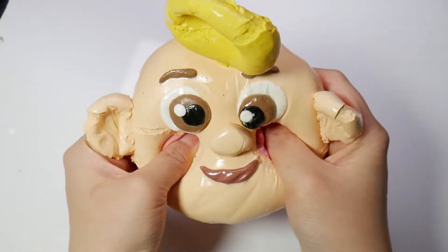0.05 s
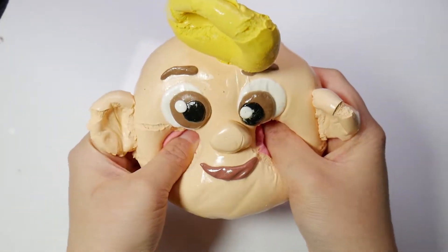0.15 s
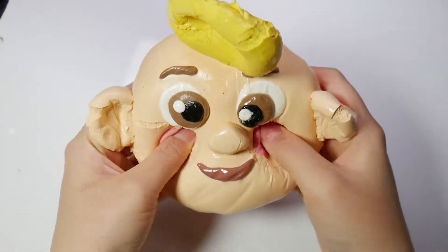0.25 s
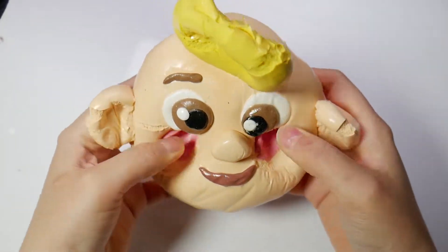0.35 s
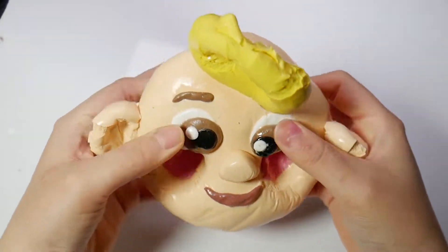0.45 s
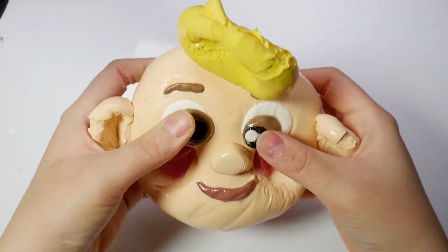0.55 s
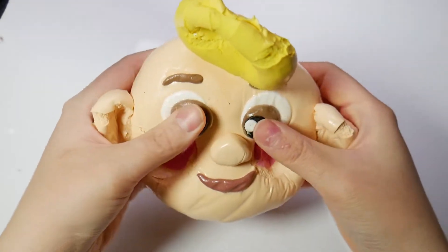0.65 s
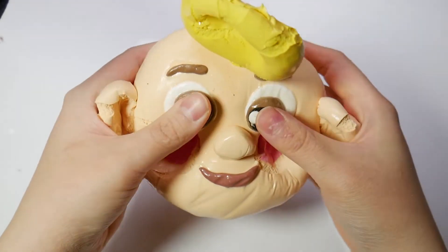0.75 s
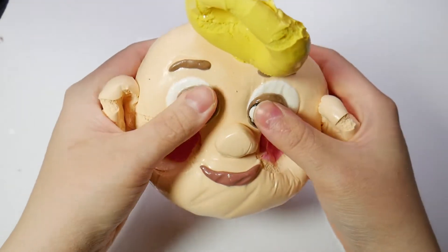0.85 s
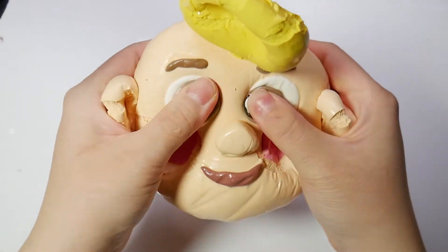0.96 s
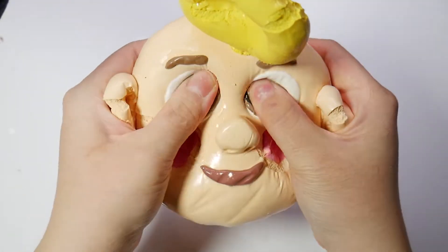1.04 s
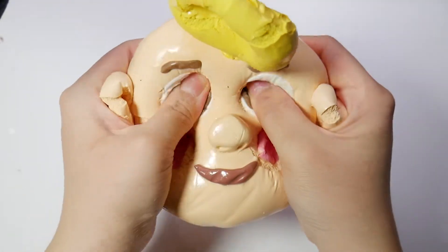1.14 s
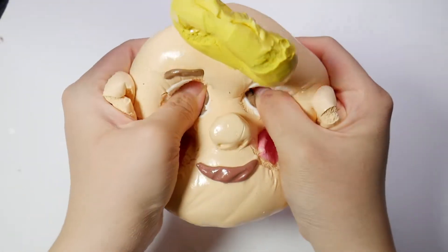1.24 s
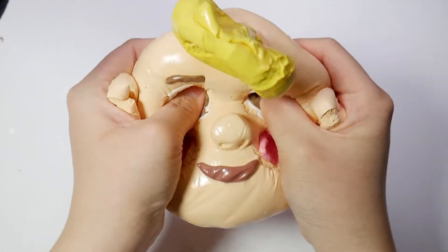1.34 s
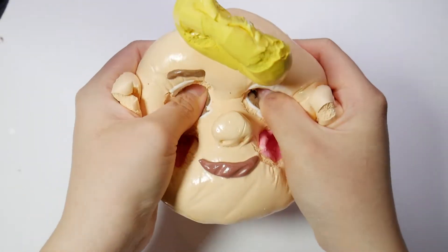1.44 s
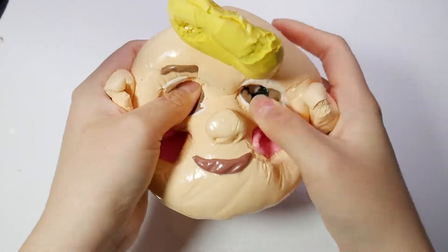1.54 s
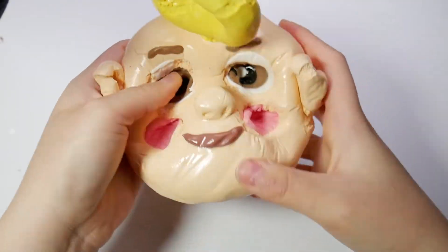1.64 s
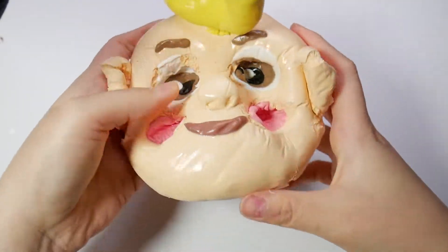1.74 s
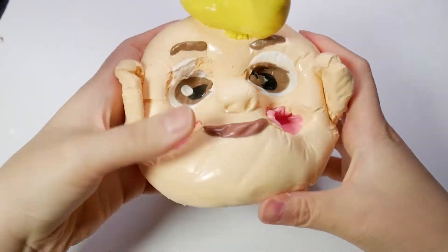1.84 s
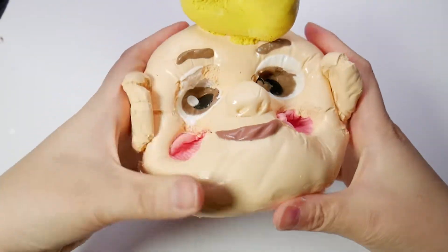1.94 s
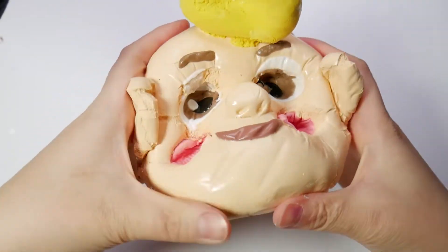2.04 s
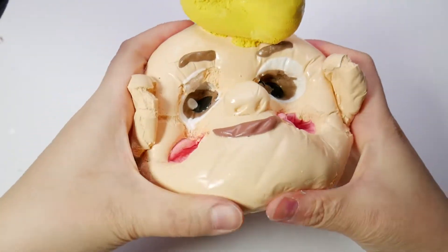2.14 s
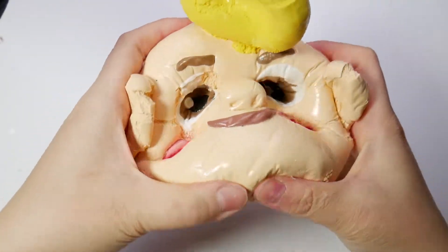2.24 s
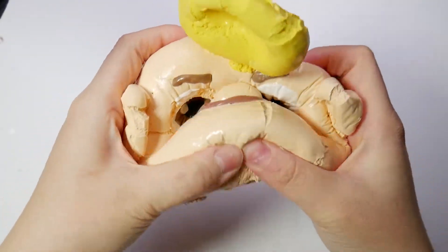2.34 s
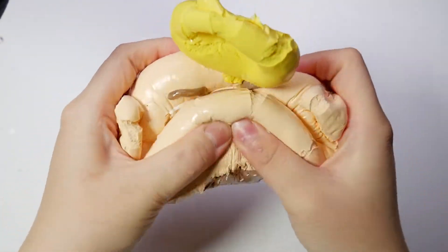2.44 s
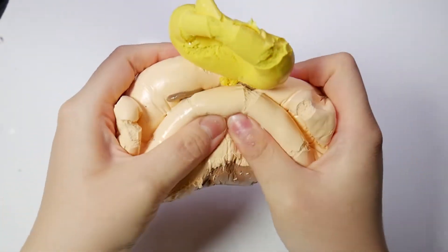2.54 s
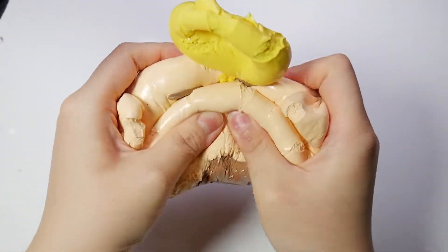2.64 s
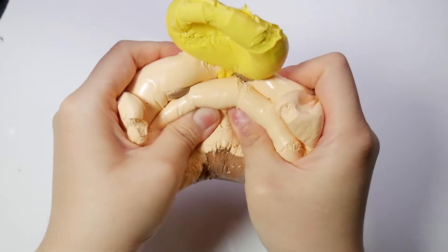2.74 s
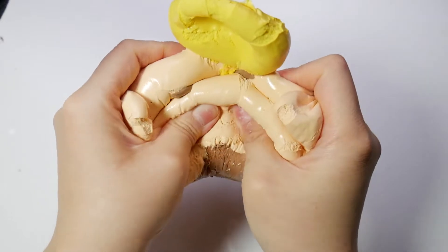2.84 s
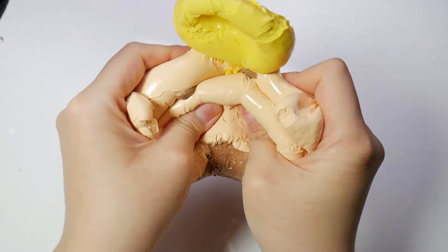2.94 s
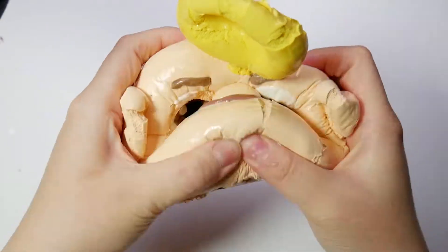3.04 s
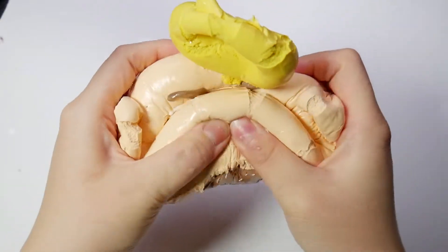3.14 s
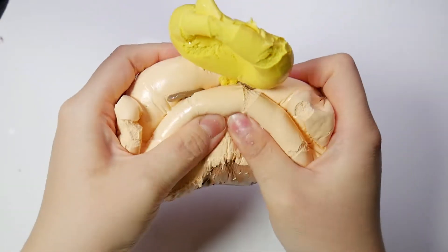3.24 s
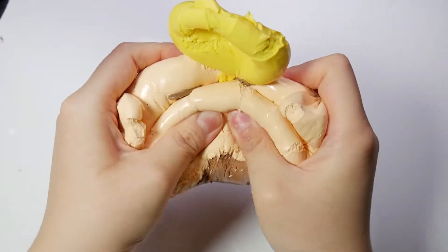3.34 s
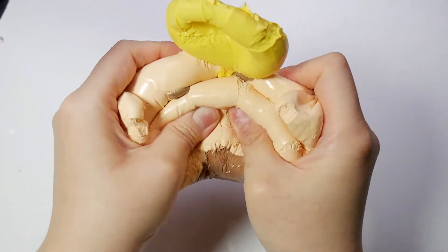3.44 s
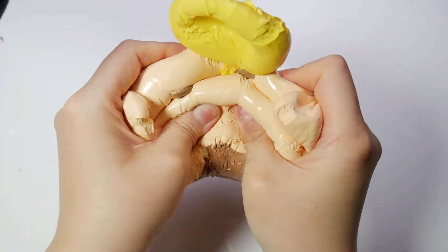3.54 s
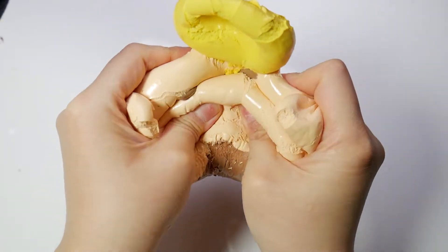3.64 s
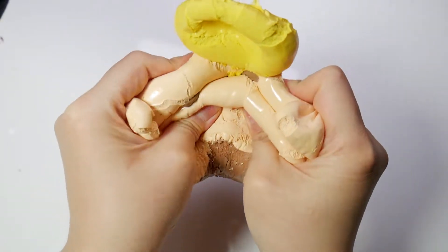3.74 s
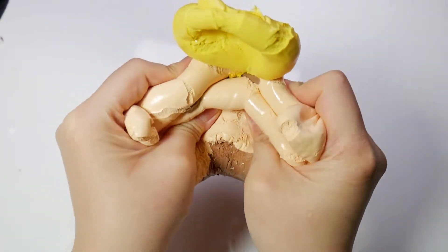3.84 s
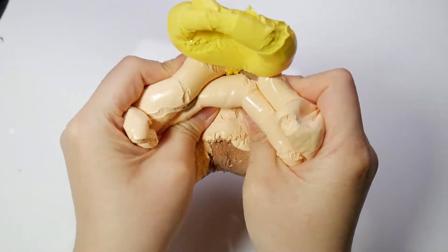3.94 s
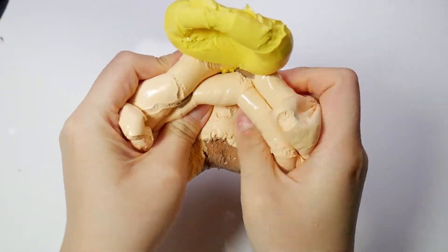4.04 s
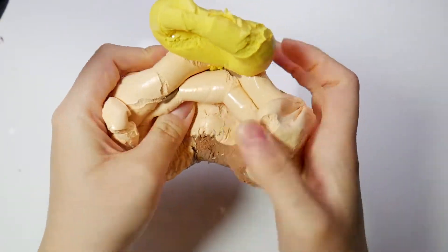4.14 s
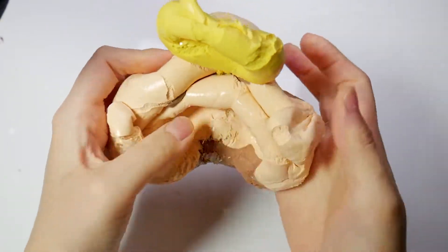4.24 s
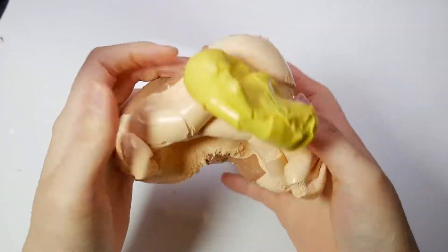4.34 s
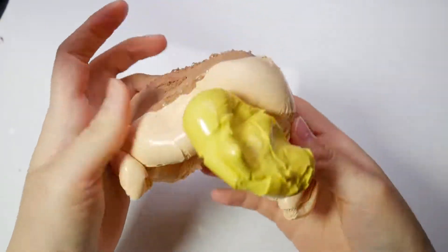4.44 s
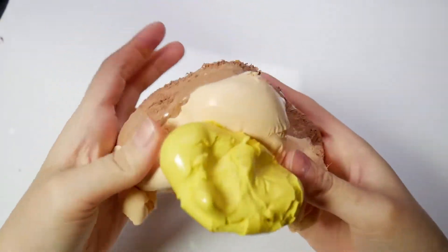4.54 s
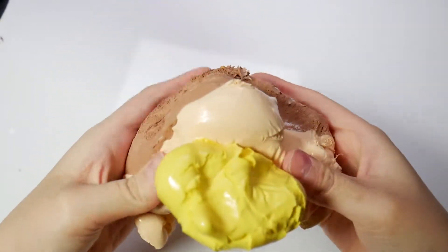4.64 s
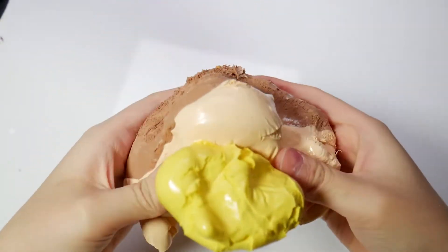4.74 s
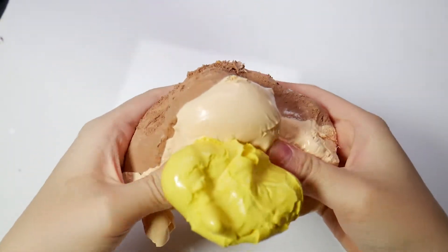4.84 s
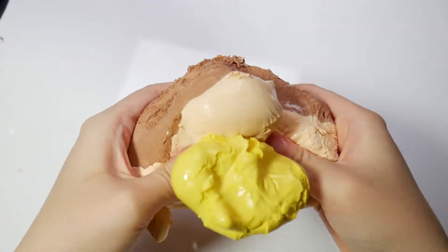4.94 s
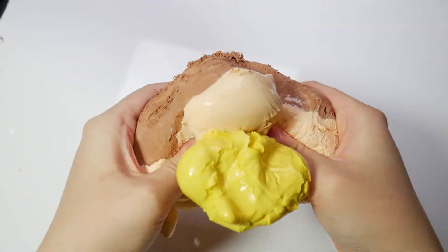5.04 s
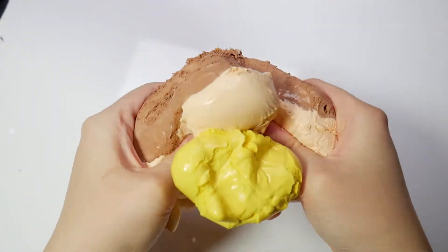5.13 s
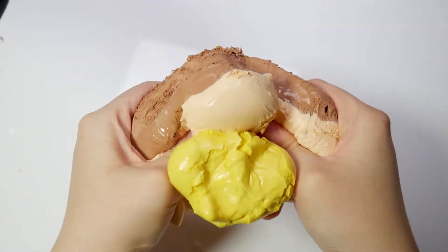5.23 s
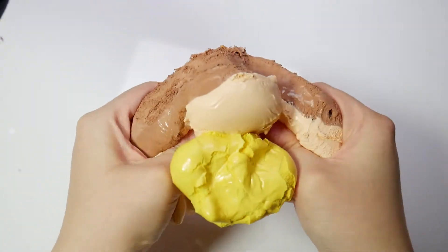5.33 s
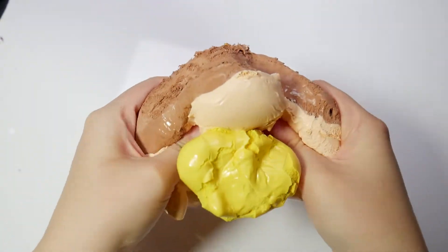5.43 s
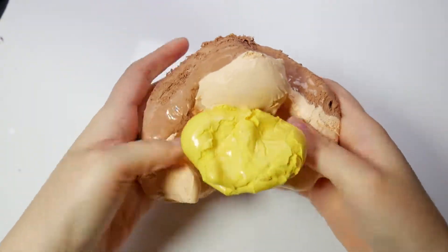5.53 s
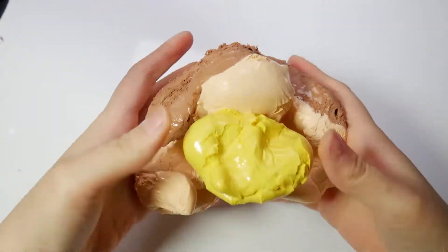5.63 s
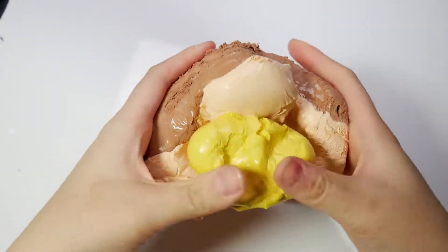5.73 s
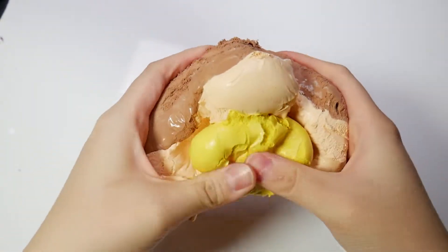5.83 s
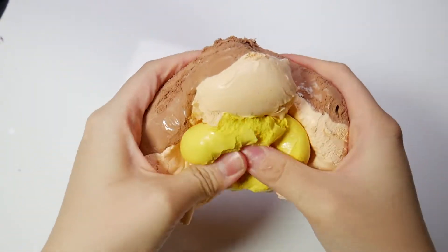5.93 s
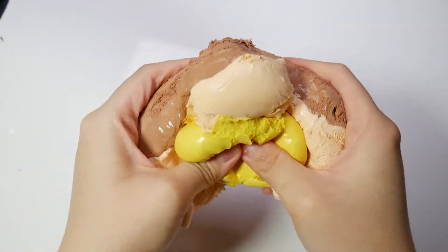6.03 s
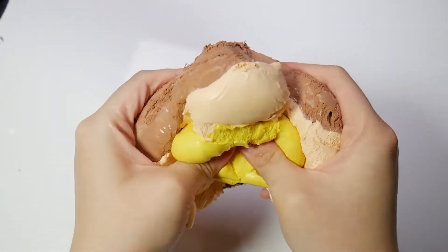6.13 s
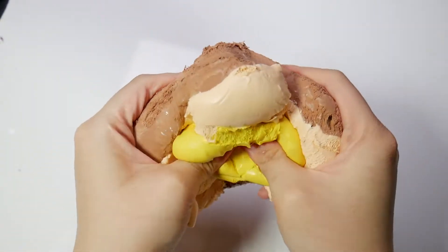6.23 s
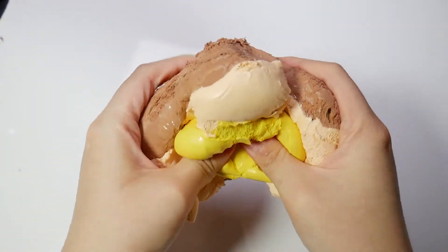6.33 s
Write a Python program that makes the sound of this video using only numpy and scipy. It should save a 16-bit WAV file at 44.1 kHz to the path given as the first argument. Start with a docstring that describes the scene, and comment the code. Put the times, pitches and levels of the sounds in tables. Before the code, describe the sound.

A clay figure with a brittle glazed shell is squeezed close to a stereo microphone in a small, quiet room with a soft steady hush. Two or three snaps come at about 0.3 seconds, a lighter one near 0.5, then near quiet. From 1.05 to 1.37 a tight cluster of sharp cracks ends in a fast, dry ratcheting tear. Isolated cracks follow at 1.6 and 1.9. From 2.3 to about 3.75 comes a dense, loud run of crunches, hollow thumps and splintering, its later half repeating what was just heard, the strongest hits slightly distorted. A few cracks follow around 3.8, then faint crackle and moist clay rustle with small ticks until 4.8. A strong burst hits at 4.9 to 5.05, another at 5.25, smaller ones at 5.5 to 5.6, then a final crunchy series from 5.95 to 6.25, and a last brief crackle around 6.4.

```python
"""Sharp cracks with hollow thumps, fine crackle and a moist rustle, in bursts over a steady room hush.
Two hands squeeze a clay figure with a brittle glazed shell, close to a stereo microphone in a small quiet room.
Cracks and slips are ringing sines and noise bursts; crackle and soft clay are filtered random ticks
that swell with each squeeze, and a noise tail gives the room. An edit plays one stretch of the crushing
twice, the loudest cracks overload the recorder, and the sound is dull at the very top."""
import sys
import numpy as np
from scipy import signal
from scipy.fft import rfft, irfft
from scipy.io import wavfile
from scipy.ndimage import uniform_filter1d

SR = 44100
rng = np.random.default_rng(int(sys.argv[2]) if len(sys.argv) > 2 else 0)


def unload_wav(signal):
    """Save mono or channel-first audio to the path in sys.argv[1] as 16-bit WAV at rate SR, clipped to [-1, 1]."""
    wavfile.write(
        sys.argv[1],
        SR,
        np.round(np.clip(np.atleast_2d(signal).T, -1, 1) * 32767).astype(np.int16),
    )


N = 281358

# Colour of the room hush. Each row: frequency in Hz, relative level in dB.
AIR_COLOUR = [(15, -57), (25, -25), (200, 8.5), (818, 6.5), (1100, 4), (2990, -3), (3820, -10.5),
              (14800, -9), (16000, -36)]
AIR_DB = -46

# Decay of the small room. Each row: frequency in Hz, time to fall by 60 dB in seconds.
ROOM_DECAY = [(300, 0.35), (1500, 0.13), (5000, 0.24), (14000, 0.18)]
ROOM_DB = -7

# Squeezes of the hands. Each row: start of the hold in seconds, level in dB, build-up in seconds,
# hold in seconds, soft clay body in dB and crisp treble in dB, both relative to the level.
SQUEEZES = [(0.0, -40, .05, 0.0033, -17, 8.5), (0.321, -27.5, 0.19, 0.059, -12, -1),
            (0.49, -38, 0.13, 0.0068, -10, 2), (0.799, -41, 0.02, 0.0045, -28, 5),
            (0.992, -44, 0.065, .06, -25, 10.5), (1.06, -27.5, .02, 0.11, -30, 1),
            (1.25, -35.5, 0.19, 0.1, -30, 7.5), (1.546, -33.5, 0.17, 0.029, -17, -1),
            (1.683, -26.5, 0.25, 0.0059, -13.5, 1), (1.88, -38, 0.15, .02, -7, -7),
            (2.284, -27, 0.081, 0.037, -26, 4), (2.424, -17, 0.13, 0.04, -24, 3.5),
            (2.568, -30.5, 0.6, 0.42, -10, 3.5), (3.761, -31.5, .1, 0.084, -14.5, -4),
            (4.063, -30.5, 0.1, 0.059, -10, -1), (4.247, -28, 0.22, 0.0043, -9.5, 3.5),
            (4.374, -32.5, 0.058, 0.063, -7, 2), (4.526, -29, 0.071, 0.0056, -11, -2),
            (4.842, -47, 0.032, .07, -29, 1), (4.915, -28, 0.022, .005, -11, 0.5),
            (4.995, -12.5, 0.019, 0.0026, -12, 2), (5.3, -24.5, 0.18, 0.0086, -7, -1),
            (5.511, -25.5, 0.067, 0.11, -3, -0.5), (5.806, -32.5, 0.068, 0.027, -12, 2.3),
            (6.003, -28.5, 0.15, 0.21, -10, -6), (6.109, -32.5, 0.2, 0.12, -8, -3),
            (6.38, -25, 0.041, 0.0075, -21, 0)]
BUILD_DB, RELEASE_DB_PER_S = 40, 232  # rise over one build-up time; fall once the grip eases
HOLDING_DB, HOLDING_BODY_DB = -55.5, -29  # faint crackle of merely holding; its soft body relative to that
CRISP_HZ = 6900  # flakes above this pitch follow the crisp column

# Colour of the fine crackle. Each row: frequency in Hz, relative level in dB.
SHELL_COLOUR = [(500, -7), (1000, -13), (1600, -5), (2600, -8.5), (5000, -11), (10000, -19), (14500, -26.5),
                (16000, -34)]

# A seam tearing open in quick slips. Each row: first slip in seconds, last slip in seconds,
# number of slips, first level in dB, last level in dB (levels before the band filter).
SEAM_SLIPS = [(1.286, 1.312, 6, -12, -6), (1.3405, 1.367, 7, -3, -9)]
SLIP_HZ = 3900

# Modes of the hollow body. Each row: frequency in Hz, relative level in dB,
# time to fall by 60 dB in seconds. Pitch and level scatter at random from crack to crack.
HOLLOW_MODES = [(772, -25, 0.033), (856, -8.5, 0.017)]

# Cracks of the shell. Each row: start in seconds, level in dB (before a small left-right scatter and
# the band filter), ring of the shard in Hz, hollow thump in dB relative to the crack.
CRACKS = [(0.2789, -17.5, 4000, -5), (0.2938, -5, 3680, -2.5), (0.3341, -4, 3900, -4),
          (0.4731, -13, 3460, -17), (0.8014, -19, 1330, -1.5), (0.972, -15, 5900, -22),
          (1.0505, -2.5, 2200, -32), (1.0606, 4, 2320, -0.5), (1.112, -5, 2500, 0), (1.132, -1, 4750, -13),
          (1.1555, -2.5, 3960, -1.5), (1.2127, -15, 2350, -16), (1.22, -9.5, 2520, -18),
          (1.2306, -17, 4310, -11), (1.2475, -15, 4310, -8), (1.3193, -12.5, 4180, -28),
          (1.335, -8.5, 2800, -37), (1.5748, -5, 1800, 0), (1.6676, -25, 6800, 13.5),
          (1.6739, -5, 1590, -4.5), (1.8736, -21, 1470, 10), (2.2793, 5.5, 1850, -8.5),
          (2.3086, -5, 2350, -31), (2.3345, -5, 1790, -2), (2.3506, 6.5, 1730, 4.5),
          (2.356, -0.5, 2000, -2.5), (2.3853, -4, 2260, -27), (2.4027, -4.5, 1890, -4),
          (2.4084, -7, 2260, 12), (2.4159, 1.5, 6800, 8), (2.4291, 1, 1850, -15), (2.4402, 7.5, 2100, 1),
          (2.447, -1.5, 2350, 10.5), (2.4886, -5.5, 1650, -25), (2.5171, 1.5, 1750, 1),
          (2.5364, -1, 1870, -16), (2.5823, -6.5, 2260, -30), (2.5997, 3.5, 1770, -1),
          (2.615, -4, 2300, -17), (2.6731, 7.5, 1690, -1), (2.6843, 1, 4240, -39), (2.7108, -5, 1960, -36),
          (2.7222, -3, 2300, -20), (2.7257, 3, 2330, -10.5), (2.7352, -31, 4480, -25),
          (2.7662, -12, 2400, -25), (2.7835, 2.5, 2540, -5.5), (2.793, 1.5, 2500, -10),
          (2.7975, 3.5, 2460, -34), (2.8196, 0, 1740, -8), (2.833, 4, 5150, -23), (2.849, -2.5, 1770, -5),
          (2.8735, 6, 2440, -7.5), (2.935, 6, 2300, -4.5), (2.9665, -3, 2420, -9),
          (2.9942, -9.5, 5150, -11.5), (3.0318, 0.5, 1630, -8), (3.0526, 3, 1757, -7),
          (3.059, -2, 2460, -31), (3.768, -0.5, 1795, -7.5), (3.821, -4.5, 1660, -20),
          (3.8249, 1, 7000, -17), (3.8446, -9, 5430, -23), (4.0777, -16, 1750, -24),
          (4.3394, -19.5, 1600, 2), (4.413, -12.5, 3960, 0), (4.8164, -16, 2040, -37),
          (4.9144, -7, 2170, -10), (4.9708, -4, 3020, -20), (4.9728, -2, 1980, -14),
          (4.9973, 3.5, 1740, -7.5), (5.0202, 0, 2830, -0.5), (5.039, -5.5, 1890, -5),
          (5.2055, -18, 5300, -25), (5.251, -9, 1860, -41), (5.2689, -28, 2670, -30), (5.284, 0, 1650, -5),
          (5.5218, -9.5, 1730, -27), (5.6, -14.5, 1770, 6), (5.9587, 3.5, 2300, -20),
          (6.019, -7.5, 2300, -9), (6.0355, -15, 2200, -30), (6.048, 0.5, 2060, -33),
          (6.0548, -7.5, 2940, -21), (6.0916, -10, 2030, -38), (6.097, -9, 2130, -3),
          (6.1088, 3, 2690, -29), (6.1338, -2, 2130, -57.5), (6.195, -12, 3960, -10),
          (6.219, -2, 2860, -16), (6.229, -11, 6000, 1)]
RUN_ON_S, RUN_ON_DOUBLES_DB = 0.012, 17  # 60 dB decay of a 0 dB break's splinters; doubles every 17 dB

REPEAT_AT_S, REPEAT_SAMPLES = 3.08, 30164
TOP_HZ = 16100  # low-pass edge; the sound is dull above it
LEFT_RIGHT = np.array([[1], [-1]])  # opposite signs for the two channels


def undb(db):
    """Turn decibels into an amplitude factor."""
    return 10 ** (np.asarray(db) / 20)


def unit(x):
    """Scale to an RMS of one."""
    return x / np.sqrt(np.mean(x ** 2))


def colour(x, table):
    """Filter by a (Hz, dB) curve, interpolated over log frequency."""
    hz, db = np.transpose(table)
    f = np.fft.rfftfreq(x.shape[-1], 1 / SR) + 1  # +1 keeps the logarithm finite
    gain = undb(np.interp(np.log(f), np.log(hz), db))
    return irfft(rfft(x) * gain, x.shape[-1])


def band(x, lo_hz, hi_hz):
    """Keep the band between two frequencies."""
    edges = [lo_hz, min(hi_hz, SR / 2.1)]
    return signal.sosfilt(signal.butter(2, edges, "band", fs=SR, output="sos"), x)


def fade(t, t60):
    """Exponential decay that falls by 60 dB in t60 seconds."""
    return np.exp(-np.log(1000) * t / t60)


def ticks(per_s, spread_db):
    """Random impulses of either sign, mostly small, a few large."""
    chance, sign, size = rng.random((3, N))
    level = undb(-spread_db * np.log(size + 0.001))
    return (chance < per_s / SR) * np.sign(sign - 0.5) * level


def air():
    """Steady hush of the room and the microphone: wide stereo noise with a fixed colour."""
    mid, side = rng.standard_normal((2, N))
    return undb(AIR_DB) * unit(colour(mid + 1.3 * side * LEFT_RIGHT, AIR_COLOUR))


def room(x, size=16384):
    """Diffuse tail of a small room, each octave dying at its own pace, the treble less alike left and right."""
    t, tail = np.arange(size) / SR, 0
    hz, t60 = np.transpose(ROOM_DECAY)
    for f in 250 * 2 ** np.arange(7):
        mid, side = rng.standard_normal((2, size))
        noise = mid + min(0.38 + f / 25000, 1) * side * LEFT_RIGHT
        decay = fade(t, np.interp(np.log(f), np.log(hz), t60))
        tail = tail + band(noise, f / 2 ** 0.5, f * 2 ** 0.5) * decay
    tail = tail * np.clip(t / 0.0033, 0, 1)  # soft onset in seconds
    tail = tail / np.sqrt(np.sum(tail ** 2) / 2)  # unit energy per channel on average
    return signal.fftconvolve(x.mean(axis=0, keepdims=True), tail, axes=1)[:, :N]


def grip():
    """Each squeeze builds up, holds and lets go; returns the gains of crackle, soft body and crisp treble."""
    t = np.arange(0, N, step=32) / SR
    s, db, build, hold, body_db, crisp_db = np.transpose(SQUEEZES)[:, :, None]
    below_db = BUILD_DB * np.clip(s - t, 0, None) / np.clip(build, 0.005, None)
    release_db = RELEASE_DB_PER_S * np.clip(t - s - hold, 0, None)
    power = undb(db - below_db - release_db) ** 2

    def gain(holding_db, each_db):
        """Add the powers of holding and of all squeezes."""
        squeezed = (power * undb(each_db) ** 2).sum(axis=0)
        total = np.sqrt(undb(HOLDING_DB + holding_db) ** 2 + squeezed)
        return np.interp(np.arange(N) / SR, t, total)

    return gain(0, 0), gain(HOLDING_BODY_DB, body_db), gain(0, crisp_db)


def body():
    """Soft clay gives way in dull, wet lumps: random ticks kept to a low band."""
    return unit(band(band(ticks(300, 4.8), 234, 1630), 180, 910))


def crackle():
    """Tiny breaks all over the shell, in pitch bands whose place wanders, over a moist rustle of noise."""
    flakes, wide = 0, ticks(260, 2.4)  # the wide ticks sound in every band at once
    for hz in 1000 * 2 ** np.arange(0, 4, 0.5):
        own = ticks(hz / 4, 3.86)
        pitched = unit(band(own + 1.35 * wide, hz / 1.306, hz * 1.39)) * np.sqrt(hz)
        # left-right balance, smoothed over 10 ms
        pan_db = 4.7 * uniform_filter1d(rng.standard_normal(N), size=441) * np.sqrt(441)
        flakes = flakes + pitched * undb(pan_db * LEFT_RIGHT / 2)
    mid, side = rng.standard_normal((2, N))
    rustle = mid + 0.77 * side * LEFT_RIGHT
    return unit(colour(unit(flakes) + 0.077 * rustle, SHELL_COLOUR))


def slips(size=256):
    """A seam tears open in slips: short dry ticks at slightly uneven gaps, all with one colour."""
    out, t = np.zeros(N), np.arange(size) / SR
    tick = np.sin(2 * np.pi * SLIP_HZ * t) * fade(t, 0.0013)
    for first, last, count, first_db, last_db in SEAM_SLIPS:
        times = np.linspace(first, last, count) + 0.00052 * rng.standard_normal(count)
        out[(times * SR).astype(int)] = undb(np.linspace(first_db, last_db, count))
    return band(np.convolve(out, tick)[:N], 1800, 15000)


def hollow_thump(t, detune, level):
    """Short low thump of two decaying modes, with pitch and level scattered at random for each crack."""
    out = 0
    for (hz, db, t60), j, k in zip(HOLLOW_MODES, detune, level):
        scattered_hz = hz * np.exp(0.06 * j)
        out = out + undb(db + 3 * k) * np.sin(2 * np.pi * scattered_hz * t) * fade(t, t60)
    return out


def cracks(size=2048):
    """Each break is a bright snap, a run of splinters, a briefly ringing shard and a thump of the hollow body."""
    out, t = np.zeros((2, N + size)), np.arange(size) / SR
    noise = rng.standard_normal((len(CRACKS), 3, size))
    chance = rng.standard_normal((len(CRACKS), 6))
    for (s, db, hz, thump_db), n, c in zip(CRACKS, noise, chance):
        longer = 2 ** (db / RUN_ON_DOUBLES_DB)  # stronger breaks last longer
        snap_noise = n[0] + 0.12 * n[1] * LEFT_RIGHT
        snap = band(snap_noise * fade(t, 0.0077 * longer), 4320, 13800)
        # cubed noise is spiky, like separate splinters as the crack runs on
        splinters = n[2] ** 3 / np.sqrt(15) * fade(t, RUN_ON_S * longer)
        tear = band(splinters, max(hz / 2.26, 1500), hz * 1.87)
        shard = np.sign(c[0]) * np.sin(2 * np.pi * hz * t) * fade(t, 8 / hz)
        thump = undb(thump_db) * hollow_thump(t, c[1:3], c[3:5])
        one = shard + 1.846 * tear + 1.01 * snap + thump
        i = int(s * SR)
        out[:, i:i + size] += undb(db + 1.66 * c[5] * LEFT_RIGHT) * one
    return band(out[:, :N], 370, 9700)


def scene():
    """Mix the squeezed clay with its room tail and the hush, then repeat one stretch."""
    shell, soft, crisp = grip()
    flakes = crackle()
    treble = colour(flakes, [(CRISP_HZ / 2 ** 0.5, -20), (CRISP_HZ, 0)])
    crushing = shell * (flakes - treble) + crisp * treble + soft * body()
    clay = cracks() + slips() + crushing
    sound = clay + undb(ROOM_DB) * room(clay) + air()
    # the edit jumps back and plays the stretch just heard once more
    i = int(REPEAT_AT_S * SR)
    sound[:, i:i + REPEAT_SAMPLES] = sound[:, i - REPEAT_SAMPLES:i]
    return sound


def record(dry):
    """A slightly hotter right port, hard overload at full scale, then a steep low-pass."""
    hot = dry * undb([[-0.2], [0.2]])
    low_pass = signal.ellip(8, 0.2, 70, TOP_HZ, fs=SR, output="sos")
    return signal.sosfilt(low_pass, np.clip(hot, -1, 1))


dry = scene()
out = record(dry)
unload_wav(out)
```